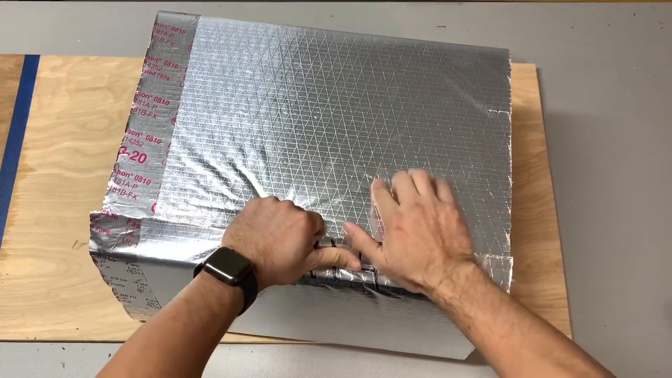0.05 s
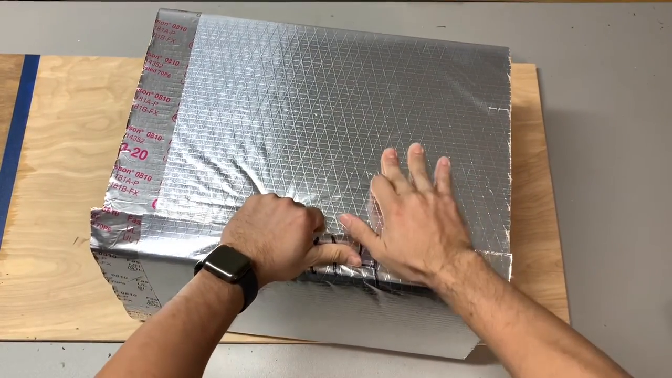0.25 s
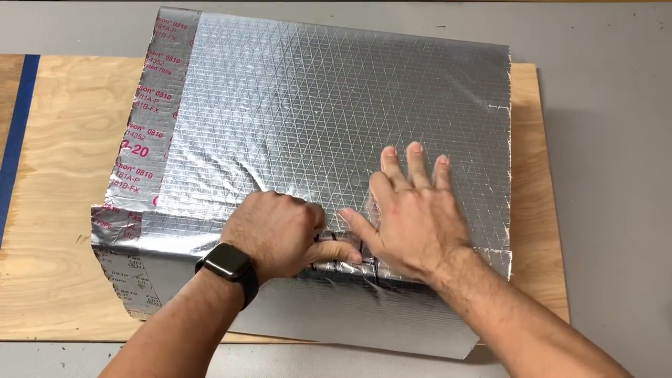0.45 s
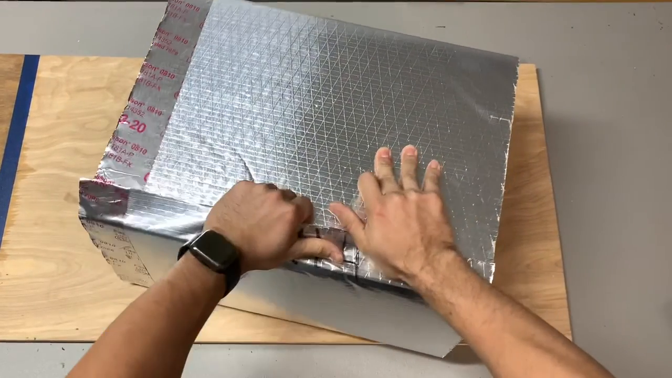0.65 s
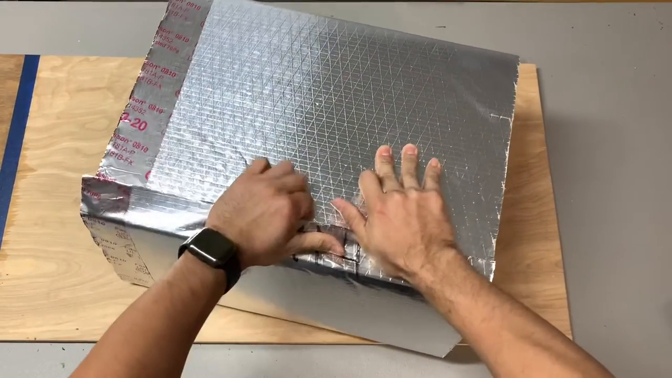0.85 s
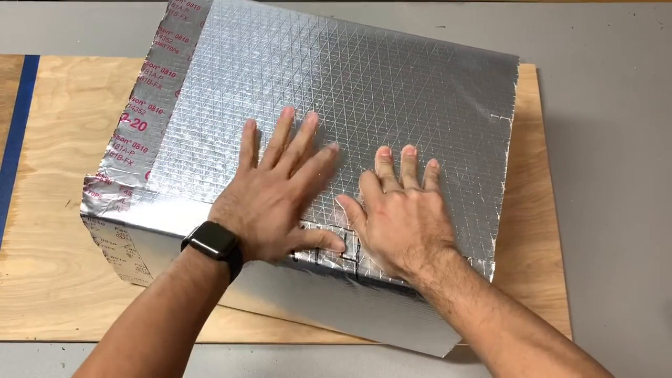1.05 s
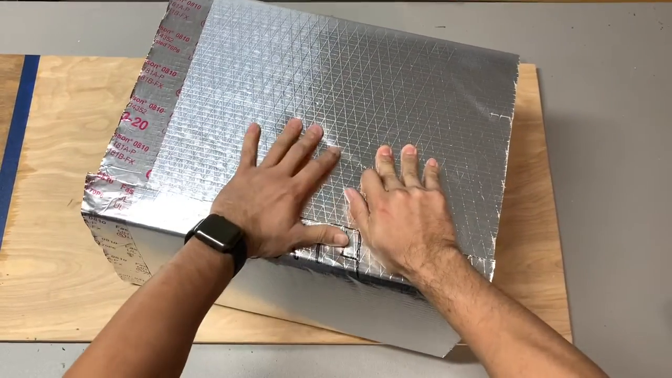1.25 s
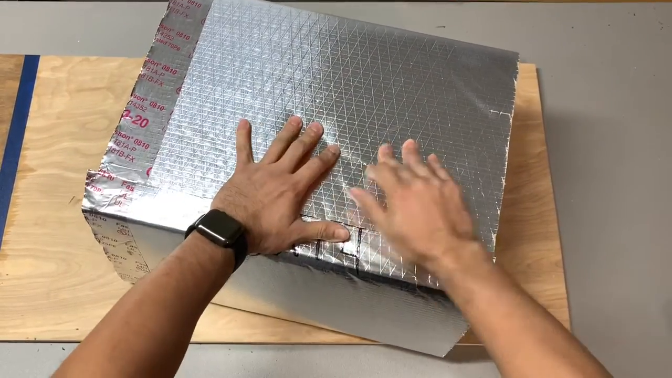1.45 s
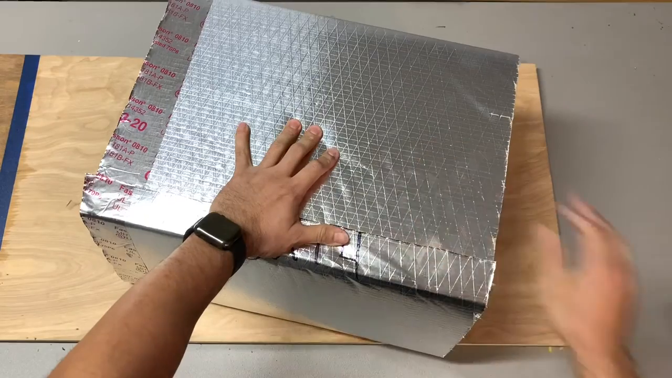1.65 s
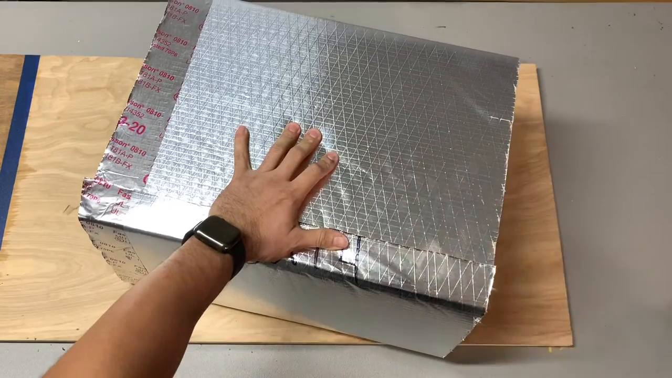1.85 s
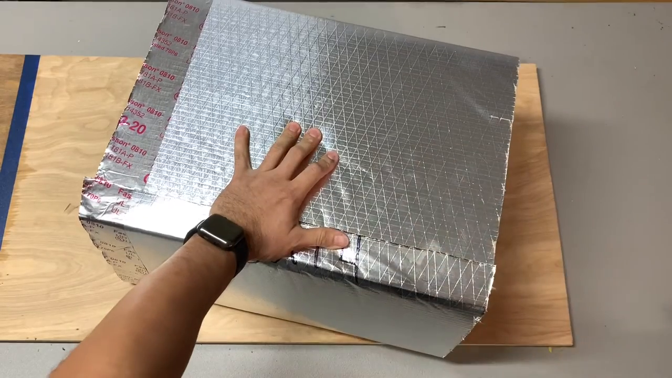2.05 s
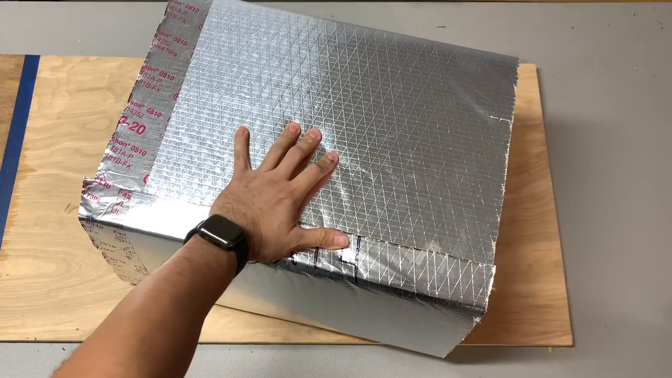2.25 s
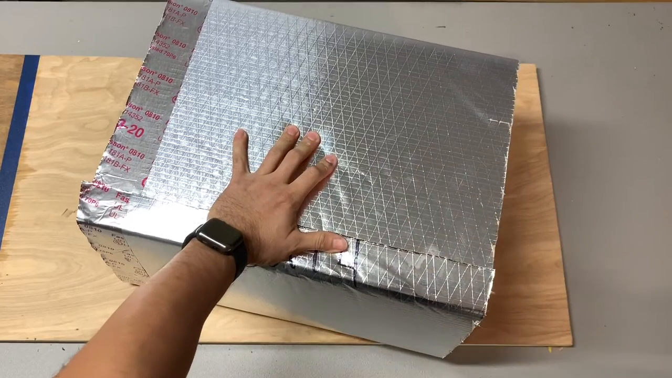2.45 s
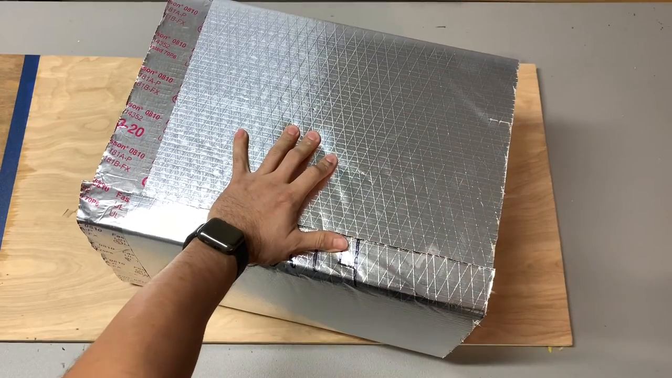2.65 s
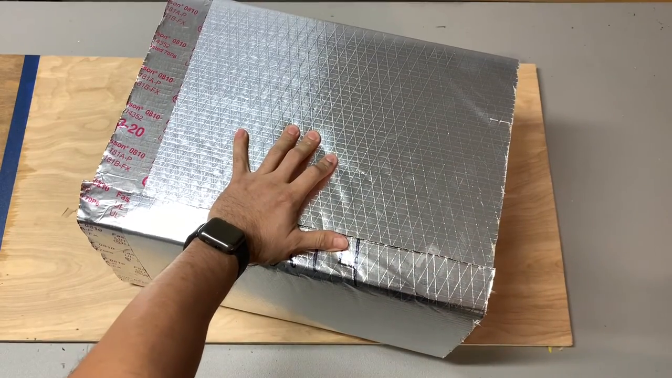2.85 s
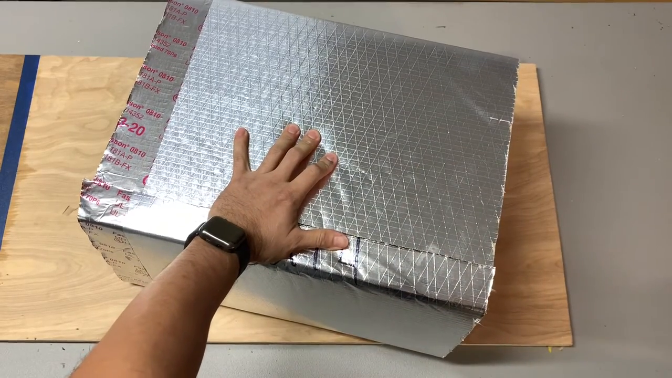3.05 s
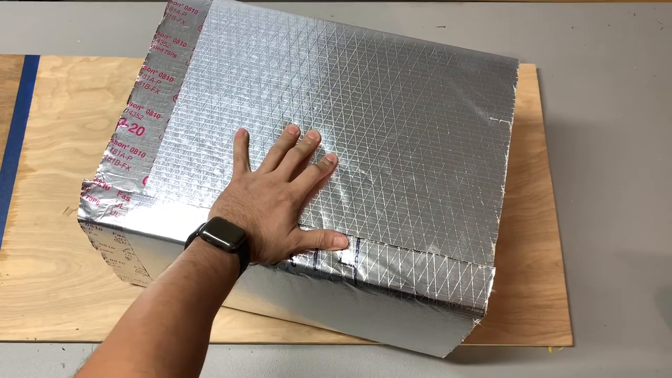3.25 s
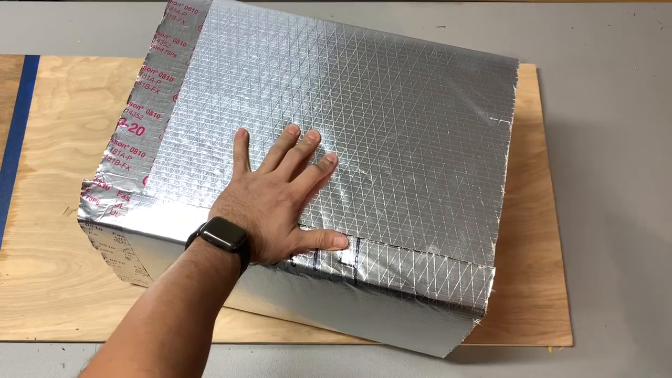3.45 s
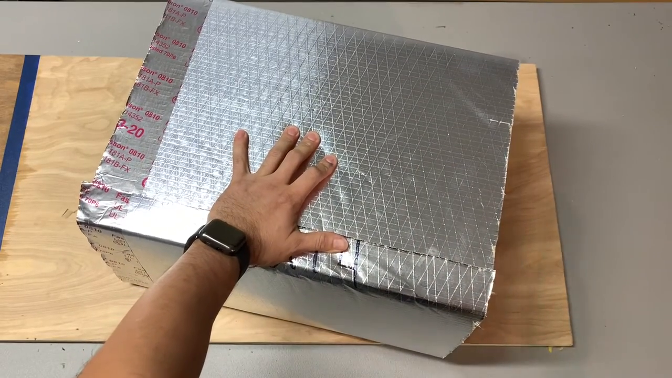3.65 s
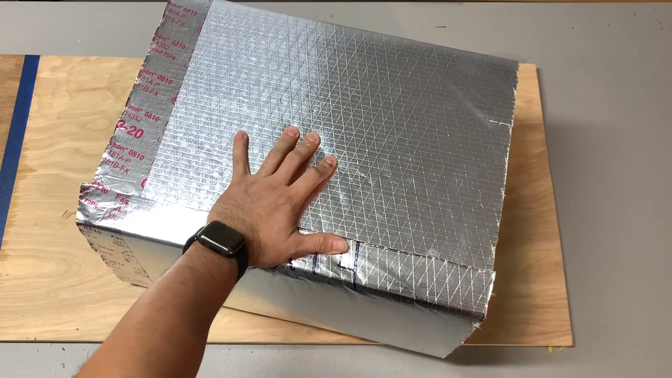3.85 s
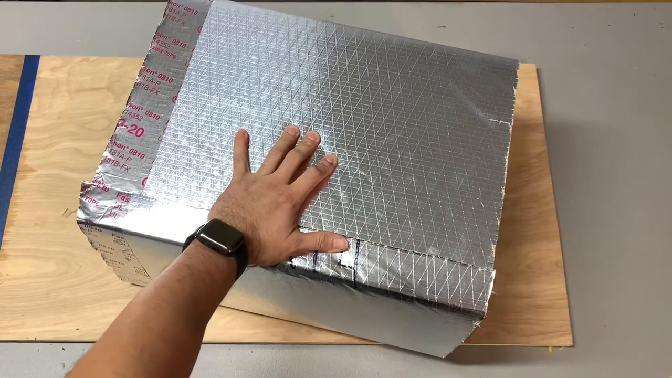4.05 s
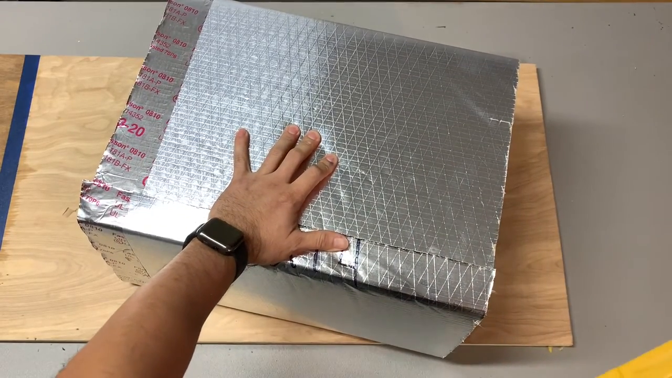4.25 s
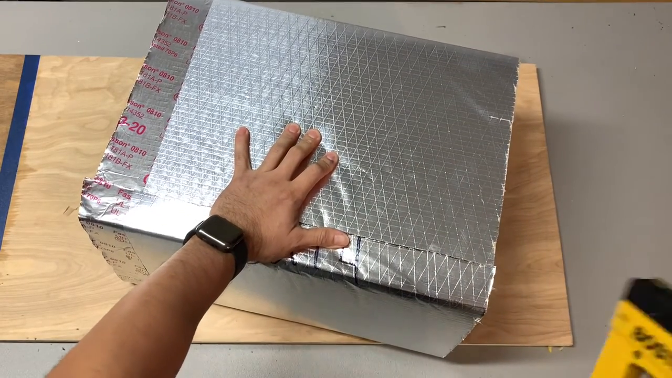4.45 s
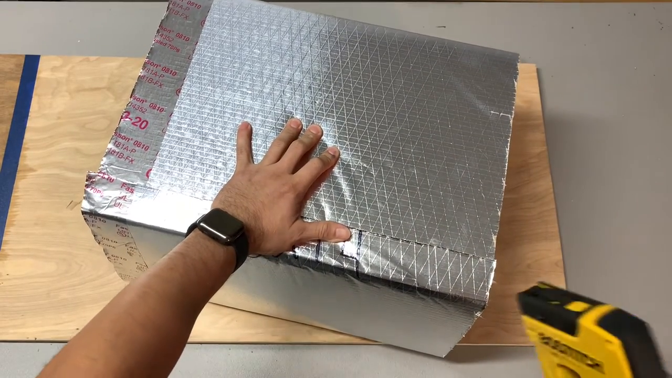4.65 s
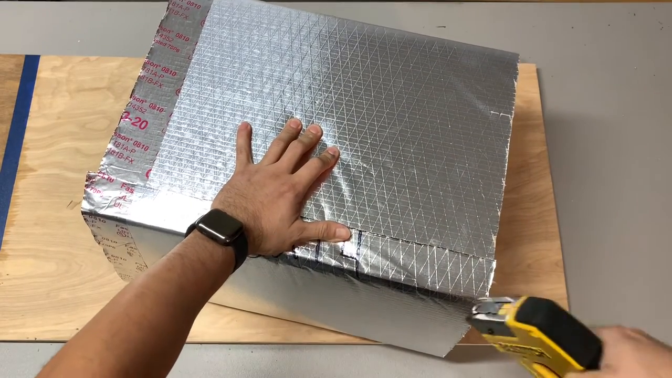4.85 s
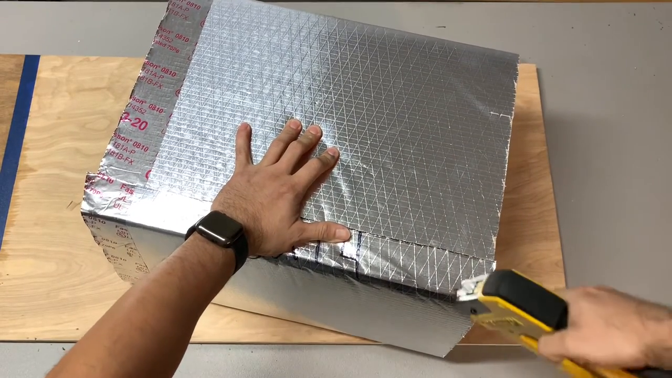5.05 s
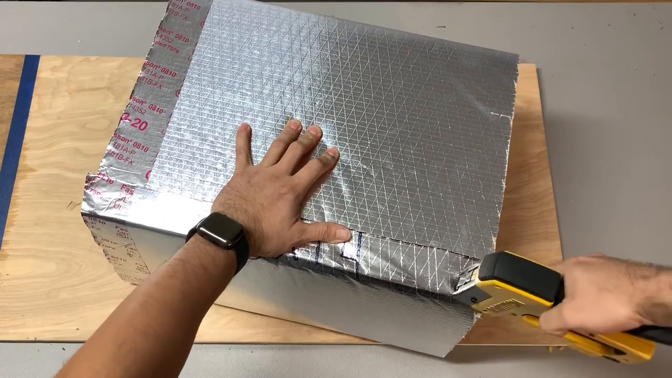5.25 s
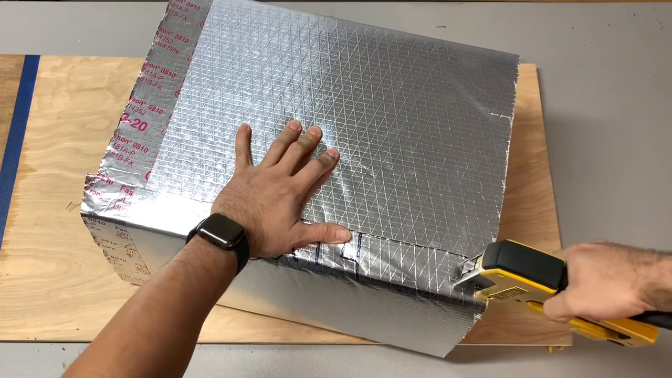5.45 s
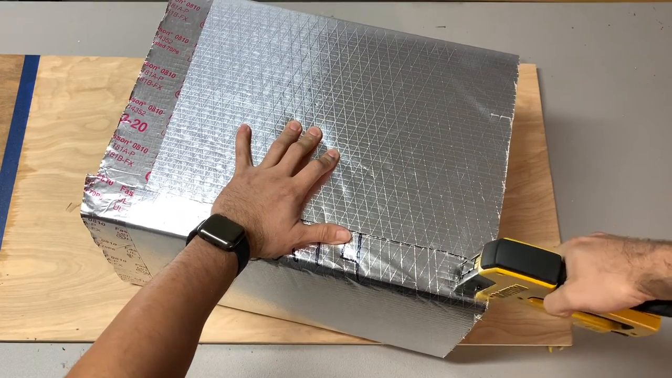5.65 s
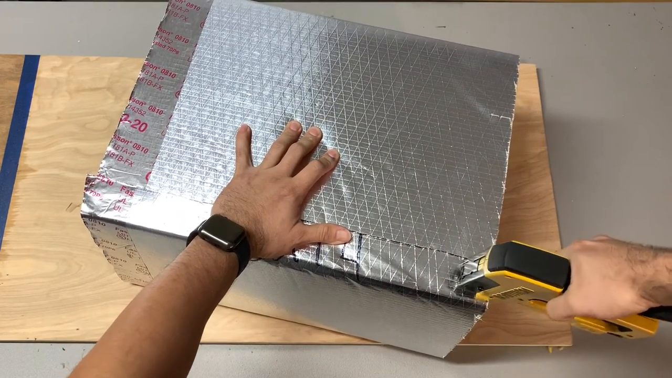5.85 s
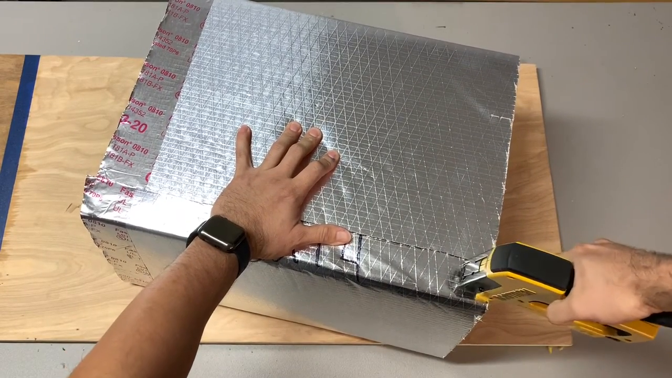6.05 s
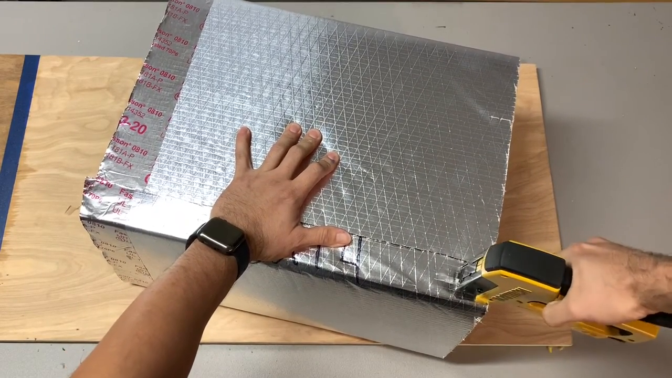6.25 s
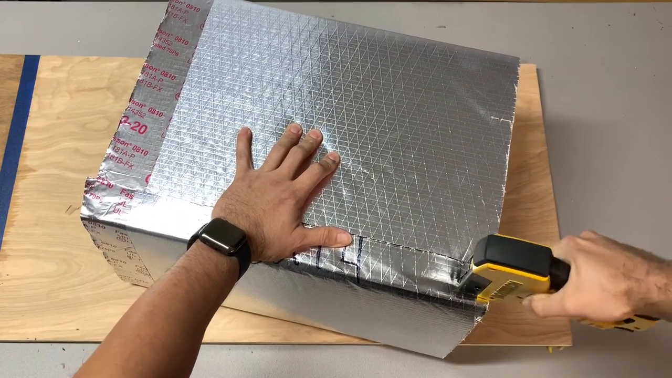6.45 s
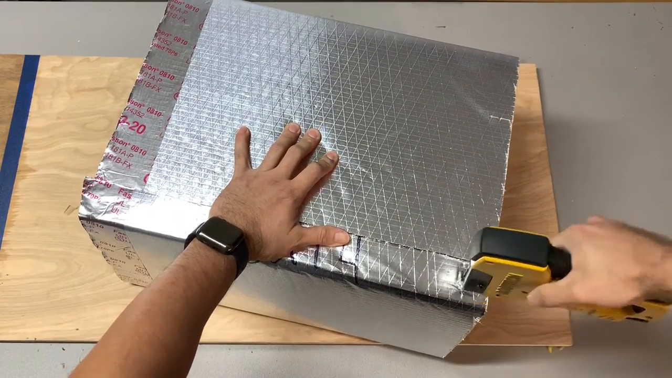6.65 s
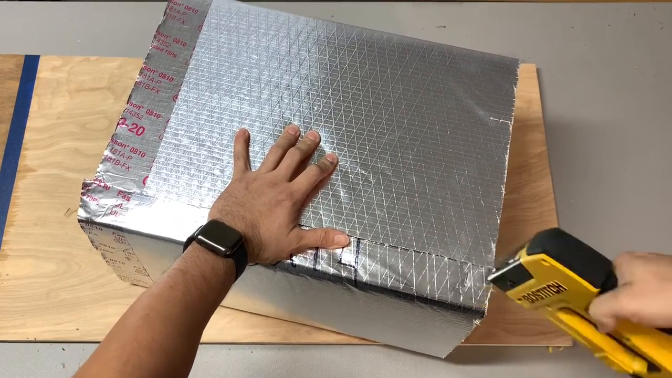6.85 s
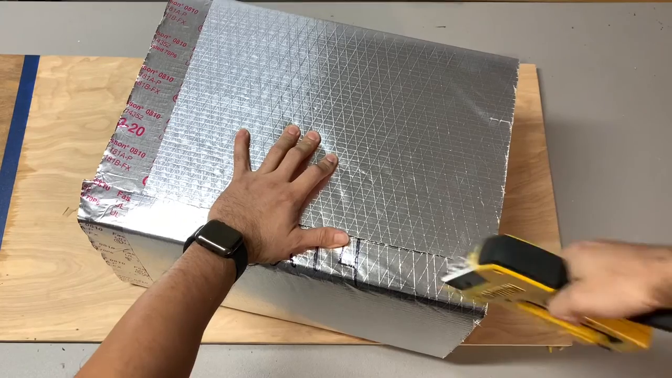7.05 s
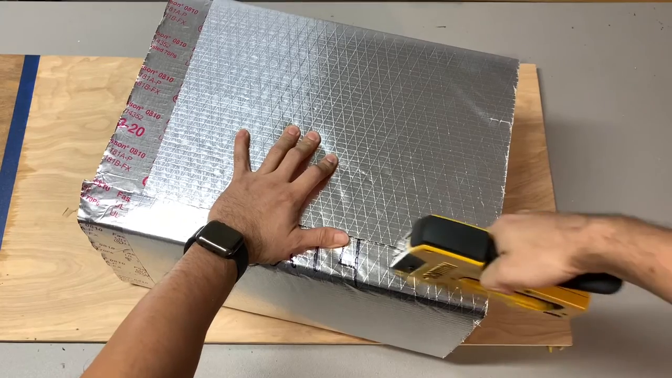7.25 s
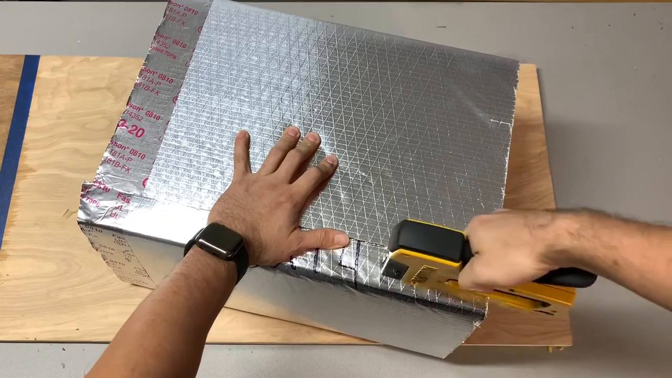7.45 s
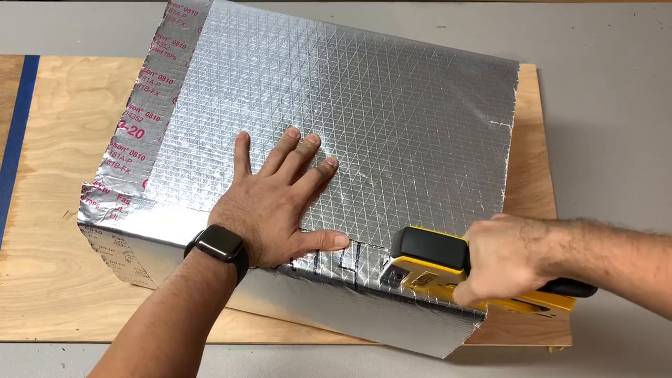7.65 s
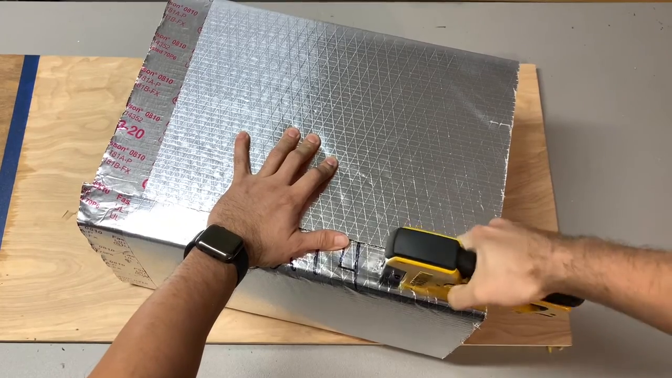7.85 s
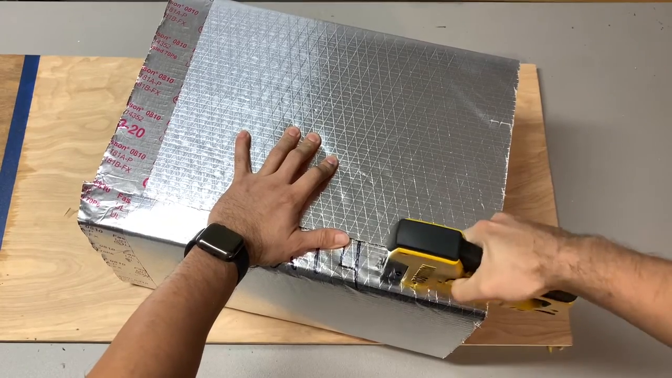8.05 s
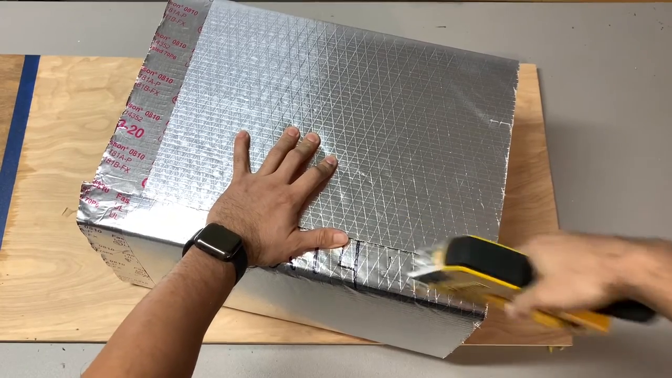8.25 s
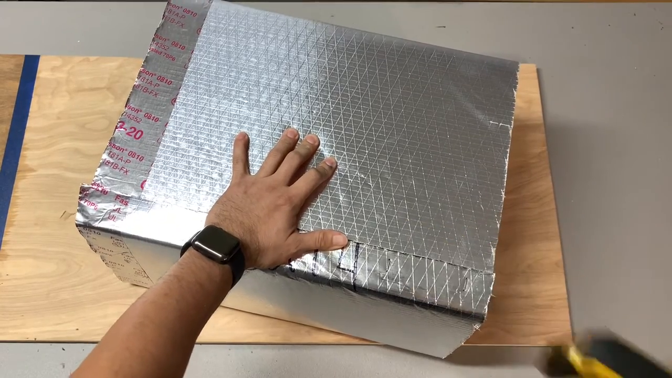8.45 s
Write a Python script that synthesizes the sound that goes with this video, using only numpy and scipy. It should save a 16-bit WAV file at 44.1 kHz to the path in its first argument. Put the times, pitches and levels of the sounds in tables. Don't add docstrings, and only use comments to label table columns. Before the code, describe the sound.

Hands thump and rub a hollow foil-covered foam box, foil crinkling, then a stapler clicks and fires two sharp, loud snaps in a workshop.

```python
import sys
import numpy as np
from scipy import signal
from scipy.fft import rfft, irfft, next_fast_len
from scipy.io import wavfile
from scipy.ndimage import uniform_filter1d, map_coordinates

SR = 44100
rng = np.random.default_rng(int(sys.argv[2]) if len(sys.argv) > 2 else 0)


def to_linear_factor(level_db):
    exponent = np.asarray(level_db, float) / 20
    return 10 ** exponent


def master(y):
    cut = np.clip(np.atleast_2d(y).T, -1, 1)
    pcm = np.round(cut * 32767)
    wavfile.write(sys.argv[1], SR, pcm.astype(np.int16))


N = 375291

# [t/s of peak, boom level/dB, rise/s, fall/s, rumble over boom/dB]
LEANS = [(0, -55, .1, 0.2, 8), (.09, -45.5, 0.18, 0.22, -4.5), (.2, -41, 0.14, 0.099, -13),
         (.38, -40, 0.066, 0.2, -16.5), (.52, -44, 0.4, 0.22, -23), (.81, -47, 0.096, 0.13, -5),
         (1.08, -48.5, 0.13, 0.49, -1.5), (1.37, -54, 0.086, 0.087, 1), (1.68, -63, 0.63, 0.29, -7),
         (2.03, -43.5, 0.064, 0.32, 0.5), (2.12, -48, 0.05, 0.26, 0), (2.29, -51, 0.14, 0.1, 4),
         (2.7, -40, 0.013, 0.14, -16), (2.95, -40.5, 0.16, 0.2, -1.5), (3.6, -62.5, 0.41, 0.42, -7),
         (4.25, -64, 0.22, 0.27, -11), (4.49, -55, 0.3, 0.19, -0.5), (4.65, -64, 0.4, 1, 2),
         (5.01, -56.5, 0.24, 0.38, -1), (5.32, -50.5, 0.031, 0.17, -3), (5.98, -63, 0.046, 0.19, 7.5),
         (6.2, -63, 0.06, 0.37, 3), (7.26, -68.5, 0.0063, 0.068, 3), (7.7, -61.5, 0.23, 0.28, -6)]
# [t/s of peak, level/dB, rise/s, fall/s]
ROCKING = [
    (6.56, -45, 0.32, 0.217),
    (7.2, -68, 0.54, 0.11),
]
# [f/Hz, width/Hz, level/dB]
BOX_MODES = [(173, 130, 7), (380, 160, 0.5)]
# [f/Hz, level/dB]
RUMBLE_BAND = [(20, -71.5), (35, -6), (75, 7), (120, -9.5), (200, -42)]
# [t/s of peak, level/dB, rise/s, fall/s]
SLEEVE_SWISHES = [
    (4.42, -72, .15, .3),
    (4.92, -57, 1.5, 0.41),
    (5.75, -68.5, 1.6, .2),
]
# [t/s of peak, board level/dB, rise/s, fall/s, squeal over board/dB]
DRAGS = [
    (1.96, -71, 0.0024, 0.13, 17),
    (2.1, -60, 0.08, 0.43, -1),
    (2.3, -52, 0.22, 0.14, -5),
    (2.685, -37, 0.0081, 0.21, -8),
    (2.87, -54.5, 0.081, 0.32, 1),
    (2.97, -64, 0.13, 0.055, -22),
]

# [t/s of peak, rub level/dB, rise/s, fall/s, hiss over rub/dB]
SLIDES = [(0, -51.5, .1, 1, -2.5), (.074, -41.5, 0.028, 0.014, -14), (.19, -43.5, 0.2, 0.15, -11),
          (.45, -39, 0.12, 0.26, -5.5), (.81, -50.5, 0.17, 0.17, -2), (1.06, -63.5, 0.25, 0.068, 1),
          (1.255, -50.5, 0.027, 0.033, -13), (1.38, -57, 0.6, 0.063, -8), (1.6, -57, 0.18, 0.24, -10),
          (1.71, -62.5, 0.081, 0.036, -9), (2.0, -54, 0.059, 0.17, -2), (2.3, -53, 0.25, 0.18, -8.5),
          (2.87, -51.5, 0.078, 0.24, -8), (3.5, -65, 1, 1, -2), (4.5, -60.5, 0.52, 1, -8),
          (4.7, -78, 0.52, 1, 20), (4.985, -47, 0.017, 0.078, -5.5), (5.31, -58.5, 0.26, 0.27, -16),
          (5.6, -62, 0.019, 0.35, -0.5), (5.92, -62, 0.014, 0.46, -9), (6.18, -58, 0.082, 0.095, 0.5),
          (7.026, -65.5, 0.039, 0.029, -5), (7.45, -65.5, 0.41, 1, -4.5), (7.68, -60.5, 0.17, 0.11, 0.5),
          (8.48, -74, 0.17, 0.13, 1)]
# [t/s of peak, sizzle level/dB, rise/s, fall/s]
CRINKLES = [(0, -45.5, .1, 0.51), (.19, -49.5, .2, 0.54), (.46, -41, 0.17, 0.31), (.729, -38, .004, 0.015),
            (.738, -37, 0.005, 0.026), (.797, -33.5, 0.017, 0.036), (1.0, -50, 0.94, 1),
            (1.25, -54.5, 0.5, 0.17), (1.74, -62.5, 0.21, 0.17), (2.5, -61, 0.12, 0.049),
            (2.9, -49.5, 0.017, 0.016), (3.18, -69, 0.22, 0.2), (3.47, -59.5, 0.34, 0.26),
            (4.3, -74, 0.15, 0.97), (4.53, -60, 0.57, 1), (4.985, -49.5, 0.026, 0.36),
            (5.33, -56, 0.12, 0.078), (5.5, -52, 0.045, 0.092), (5.72, -51.5, 0.45, 0.61),
            (6.0, -70, 0.19, 0.11), (6.2, -55, 0.3, 1), (7.4, -64.5, 0.087, 0.6), (7.64, -57.5, 0.18, 1)]
# [f/Hz, level/dB]
RUB_BAND = [(300, -22), (600, -2.5), (950, -3.5), (1350, -4), (2300, -5), (3500, -20.5)]
# [f/Hz, level/dB]
HISS_BAND = [(1800, -26), (2700, -1), (4500, 2), (7200, -9.5), (9000, -36.5)]
# [f/Hz, level/dB]
SIZZLE_BAND = [(6500, -17), (7600, -11), (8800, -2.5), (11000, -11), (15500, -8.5), (16300, -21),
               (17000, -54.5)]
# [t/s of peak, level/dB, rise/s, fall/s]
SHUDDERS = [
    (.075, -61, .03, .05),
    (.19, -42.5, 0.057, 0.039),
    (.38, -41.5, 0.084, .15),
    (.44, -40, 0.091, 0.17),
    (.51, -44.5, 0.098, 0.066),
    (.8, -57, 0.029, .05),
    (1.62, -64, 0.17, 0.043),
    (2.87, -65, 0.038, 0.38),
]
# [f/Hz, width/Hz, level/dB]
PANEL_MODES = [(510, 190, -10.5), (960, 320, -8), (1750, 180, -11.5)]
# [t/s of peak, level/dB, rise/s, fall/s]
SCUFFS = [
    (1.955, -53, .006, 0.1),
    (4.99, -55.5, 0.062, .05),
    (5.305, -50, 0.02, 0.036),
    (5.6, -72, 0.018, .2),
    (5.915, -62, 0.0046, .15),
    (5.955, -58, 0.03, .06),
    (7.61, -57, 0.011, 0.027),
]
# [f/Hz, width/Hz, level/dB]
NOSE_MODES = [(1740, 470, 4.5), (2430, 640, 0)]

# [t/s, level/dB, f/Hz, t60/s]
BOUNCES = [(.162, -36, 230, .06), (.24, -39, 253, .07), (.336, -33, 380, 0.061), (.813, -30.5, 238, 0.071),
           (1.021, -29.5, 442, 0.13), (1.067, -37.5, 427, 0.11), (1.345, -38, 600, 0.023),
           (2.018, -38.5, 212, 0.13), (2.033, -38, 222, 0.17), (2.105, -36, 169, 0.062),
           (2.681, -12, 381, 0.024), (2.692, -25.5, 337, 0.11), (2.716, -28.5, 397, 0.052),
           (2.724, -28, 425, .06), (2.74, -29, 437, 0.064), (2.756, -32, 393, 0.057),
           (2.682, -41, 950, 0.15), (2.735, -41, 722, 0.13), (2.86, -43, 1096, .08), (2.938, -34, 170, .06),
           (2.964, -31, 150, .06), (7.258, -66, 560, 0.075)]
# [t/s, peak level/dB, f/Hz, t60/s, slap level/dB]
KNOCKS = [(0.077, -28.5, 187, 0.047, -13), (0.192, -36, 215, 0.086, -17), (0.293, -41.5, 230, 0.022, -1.5),
          (0.354, -33, 416, 0.051, -7), (0.797, -36, 373, 0.061, -27), (1.0198, -20.5, 176.8, 0.12, -21),
          (1.016, -28.5, 365, 0.12, -1), (1.375, -58.5, 197, 0.08, 4), (1.961, -44, 223, 0.15, -12),
          (2.679, -46, 330, 0.14, -4), (2.975, -45, 216.7, 0.53, -17), (5.001, -47, 294, 0.14, -20),
          (5.313, -41, 298, 0.06, -0.5), (5.979, -54.5, 165, 0.14, -16), (7.251, -55, 118.8, 0.092, -3.5),
          (7.657, -55.5, 226, 0.078, 10.5)]
# [f/Hz, level/dB]
SLAP_BAND = [(200, -11), (450, 5.5), (1500, -2), (2200, -12), (5000, -15), (9000, -18)]

# [t/s, level/dB, f/Hz, t60/s]
PINGS = [(1.6, -65, 860, 0.2), (1.951, -50, 1516, 0.16), (4.32, -48, 1500, 0.074),
         (5.308, -44, 2320, 0.034), (5.965, -46, 1524, .06), (7.128, -70, 1360, 0.35),
         (7.128, -48.5, 1416, 0.034), (7.129, -58.5, 4600, .02), (7.609, -45.5, 1627, 0.05),
         (.07, -26, 1160, .012), (.126, -35, 870, .025), (.146, -30, 920, 0.02), (.179, -38, 930, .03),
         (.291, -32, 830, .03), (.866, -36.5, 624, 0.026), (1.012, -61, 1100, 0.1),
         (1.012, -38.5, 1540, .08), (1.014, -40, 1720, .1), (1.011, -37, 894, .06), (1.95, -47, 1257, 0.09),
         (5.91, -51, 1900, 0.033), (5.931, -47, 1480, .04), (5.931, -60, 1900, .02),
         (5.966, -43, 4400, 0.023), (5.966, -53, 2700, 0.028), (6.2957, -8, 1440, 0.027),
         (6.3045, -14.5, 1500, 0.013), (6.296, -18, 4410, .025), (6.3029, -19.5, 9850, 0.041),
         (7.7875, -19.5, 11350, 0.019), (7.784, -14.5, 3690, 0.038), (7.784, -20, 1500, 0.028),
         (4.018, -40, 3000, .03), (4.057, -36, 1413, 0.027), (5.308, -48, 4500, .03),
         (3.9622, -28.5, 4880, 0.1), (3.964, -34, 7350, .08), (8.058, -42.5, 3640, .03),
         (8.066, -45.5, 2310, 0.031)]
# [t/s, peak level/dB, ring f/Hz]
SNAPS = [(1.254, -46, 3550), (3.6292, -52.5, 4240), (3.7152, -31, 7350), (4.538, -50, 6500),
         (5.0776, -45, 5100), (5.13, -46.5, 6800), (5.2145, -46.5, 7170), (5.6964, -54, 4820),
         (7.354, -64.5, 6000), (7.38, -66, 6500), (7.41, -74, 6500), (7.6574, -35.5, 7100)]
# [t/s, peak level/dB, ring f/Hz]
TAPS = [(0.069, -37, 1200), (0.2915, -79, 780), (1.948, -40, 4140), (2.6793, -35, 2730), (4.018, -44, 3030),
        (4.057, -45, 1480), (5.308, -50, 2460), (6.6102, -26.5, 1650), (7.6064, -53.5, 1650)]
# [t/s, peak level/dB, ring f/Hz, body level/dB, t60/s]
CLICKS = [(1.0124, -48.5, 4500, -17, 0.081), (2.574, -73, 3260, 7, 0.019),
          (3.329, -35.5, 4230, -43, 0.0091), (3.926, -42, 4200, -23, 0.027),
          (3.9619, -21.5, 4840, -24, 0.02), (3.967, -24.5, 3600, -28, 0.04), (3.982, -23, 4560, -23, 0.014),
          (4.3178, -34.5, 5600, -12.5, 0.015), (4.7, -58, 4500, -25, 0.015), (5.299, -60, 2420, 0, 0.029),
          (5.966, -40, 4300, -5.5, 0.017), (6.2333, -50, 5100, -6, 0.1), (7.0258, -57, 2495, -10, 0.017),
          (7.128, -44, 4640, -9.5, 0.015), (8.485, -59, 5090, -1.5, 0.018)]
# [t/s, peak level/dB, ring
# f/Hz, edge level/dB, t60/s]
LATCHES = [(3.056, -44.5, 4730, -2, 0.014), (.754, -51, 9000, 12, .004), (.8495, -40, 7000, 12.5, 0.0054),
           (.867, -38, 4530, 10, 0.0053), (7.645, -53.5, 7200, 4.5, 0.013), (3.714, -44, 5100, -10, 0.023),
           (3.9539, -34.5, 5100, -18, 0.017), (3.964, -36, 7070, -6.5, 0.1), (3.997, -38, 5130, 5, 0.047),
           (4.0578, -33, 2900, -3, 0.016), (4.985, -55, 4170, -8, 0.0067),
           (6.2719, -22.5, 4440, 8.5, 0.015), (6.281, -32.5, 4300, 5, 0.018),
           (6.5889, -23, 3750, -0.5, 0.038), (6.598, -31.5, 2600, 1.5, .025), (6.623, -29, 2450, -8, 0.03),
           (7.12, -69.5, 6900, 12, 0.0071), (7.763, -28, 2080, 5.5, 0.014), (8.058, -36, 3744, 0, 0.03)]
# [f/Hz, width/Hz, level/dB]
CASE_MODES = [(800, 710, -8), (1460, 30, 9.5), (2210, 290, -2)]

# [t/s of the stop, drive level/dB, crack level/dB, crack lead/s, thud lag/s]
SHOTS = [
    (6.302, -15, -9, 0.00038, .0015),
    (7.79, -16, -14.5, 0.0038, -.0002),
]
# [thud level/dB, pitch fall f/Hz (starts near 75 + 1.8 f), t60/s, jump level/dB, skin
# level/dB]
THUDS = [
    (-6, 300, 0.099, -15.5, -29),
    (-10, 400, 0.068, -28.5, -16),
]
# [f/Hz, level/dB]
DRIVE_BAND = [(240, -53), (500, -15.5), (865, -9), (1530, 0), (2970, -11.5), (4510, -2.5), (5030, -9.5),
              (7280, -13.5), (9040, -28.5), (10500, -32.5), (16000, -44.5)]
# [f/Hz, level/dB]
CRACK_BAND = [(240, -28), (500, -18.5), (1750, -1), (2840, -24.5), (4680, -9), (6000, -24.5), (8500, 2.5),
              (10000, -3), (13500, -11.5), (15500, -8), (16500, -31)]
# [f/Hz, level/dB]
THROWN_BANDS = [
    [(350, -13), (900, -3), (1500, 0), (2400, -1), (3200, -0.5), (4500, -1.5), (6500, 0.5), (10000, 0)],
    [(350, 1), (640, -5.5), (1100, 2), (1500, -5), (2400, 2.5), (3200, 0.5), (4500, -0.5), (10000, -2)],
]

# [f/Hz, t60/s, level/dB]
ROOM_DECAY = [(101, 0.11, -27.5), (393, 0.49, -20), (804, 0.59, -8), (1540, 0.64, -10.5),
              (2600, 0.64, -5.5), (4340, 0.64, -8.5), (6500, 0.65, -6.5), (10370, 0.54, -8.5),
              (13000, 0.24, -3.5), (16000, 0.3, -10)]
# [f/Hz, width/Hz, level/dB]
LINGER_MODES = [(647, 53, 5.5), (1140, 90, 2), (1290, 48, 0.5), (1510, 100, 3.5), (1905, 50, 3),
                (2540, 120, 6), (3230, 72, 0.5), (4300, 79, 2.5), (4770, 180, 1), (6570, 200, 4)]
# [f/Hz, likeness/1]
LIKENESS = [(40, 0.56), (100, 1), (200, 0.94), (500, 0.19), (1200, 0.043), (5500, 0.013), (7000, 0.7)]
# [f/Hz, right over left/dB]
RIGHT_LEAN = [(500, 2), (1000, 0), (2500, 1), (5500, 8)]
# [t/s after the stop, level/dB]
GAIN_DUCK = [(0, 0.5), (.012, -11.5), (.03, -13), (.12, -10.5), (.2, -2.5), (.28, 0.5), (.36, 0.5)]

STILL_DB = dict(rumble=-64, boom=-73, rub=-76, hiss=-73, sizzle=-72.5)
SHY_DB = -10.5
LOW_TAIL_DELAY_S = .3
LOW_TAIL = (-64.5, 1.3, .5, -7)  # boom/dB, rise/s, fall/s, rumble over boom/dB
CREASES_PER_S, CREASE_DB = 530, -9
SNAP, TAP = (-18, 7.9, 0.013), (-21, -14, 0.026)  # body/dB, edge/dB, t60/s
CLICK_EDGE_DB, LATCH_BODY_DB = -4.5, -10
TOUCH_DB, TOUCH_T60_S = 3, 0.0026
CONTACT_RING_RATIO, LATCH_RING_RATIO = 2.7, 2
UPPER_DB = -13.5
SEND = dict(ticks=0.33, box=0.28)
FLUTTER_DB = 1


def unit(x):
    return x / np.sqrt(np.mean(x ** 2) + 1e-20)


def along(points, hz):
    f, v = np.transpose(points)
    return np.interp(np.log(hz + 1), np.log(f + 1), v)


def wobble(rate_hz):
    knots = rng.standard_normal(int(N * rate_hz / SR) + 4)
    return map_coordinates(knots, [np.arange(N) * rate_hz / SR])


def filtered(x, response):
    m = next_fast_len(x.shape[-1] + 4096)
    return irfft(rfft(x, m) * response(np.fft.rfftfreq(m, 1 / SR)), m)[..., :x.shape[-1]]


def modes(peaks, order=1):
    def response(f):
        total = 0
        for k, (c, w, db) in enumerate(peaks):
            total = total + (-1) ** k * to_linear_factor(db) * 1j * f * w / (c * c - f * f + 1j * f * w)
        return total ** order
    return response


def shape(spectrum):
    return lambda hz: to_linear_factor(along(spectrum, hz))


def high_pass(corner_hz, order=2):
    return lambda hz: hz ** order / (hz ** order + corner_hz ** order)


def noise(response, size=N):
    return unit(filtered(rng.standard_normal((2, size)), response))


def add(track, s, sound):
    start = round(s * SR)
    track[:, start:start + sound.shape[-1]] += sound[..., :N - start]


def swells(rows, floor_db, over=False):
    t_s = np.arange(0, N / SR, .002)
    rows = np.array(rows)
    late_s = t_s - rows[:, :1]
    drop = np.where(late_s < 0, -late_s / abs(rows[:, 2:3]), late_s / abs(rows[:, 3:4]))
    db = rows[:, 1:2] - 20 * drop + (rows[:, 4:] if over else 0)
    floor_db = floor_db + sum(SHY_DB * (t_s > shot[0]) for shot in SHOTS)
    gain = np.sqrt(np.sum(to_linear_factor(2 * db), axis=0) + to_linear_factor(2 * floor_db))
    return np.interp(np.arange(N) / SR, t_s, gain)


def struck(rows, length_s, rise_s, weights):
    out, t_s = np.zeros((2, N)), np.arange(int(SR * length_s)) / SR
    for s, db, hz, t60_s in rows:
        envelope = to_linear_factor(db - 60 * t_s / t60_s) * (1 - np.exp(-t_s / rise_s))
        add(out, s, envelope * np.sin(2 * np.pi * hz * t_s) * weights)
    return out


def room(x):
    hz, t_s, z = signal.stft(x[0], SR, nperseg=256)
    t60_s = along(np.array(ROOM_DECAY)[:, :2], hz)
    wet_db = along(np.array(ROOM_DECAY)[:, ::2], hz)
    keep = to_linear_factor(-120 * t_s[1] / t60_s)
    fed = abs(uniform_filter1d(abs(z) ** 2, size=5, axis=0))
    power = np.array([signal.lfilter([0, 0, 1 - k], [1, -k], p) for k, p in zip(keep, fed)])
    field = signal.stft(rng.standard_normal((2, N)), nperseg=256)[2]
    flutter = unit(uniform_filter1d(rng.standard_normal(z.shape), size=12, axis=0))
    field = field * to_linear_factor(FLUTTER_DB * flutter)
    field /= np.sqrt(np.mean(abs(field) ** 2))
    wet = field * np.sqrt(power) * to_linear_factor(wet_db + 13.0)[:, None]
    return signal.istft(wet, nperseg=256)[1][:, :N]


def standing_waves(x):
    knots = rng.standard_normal(SR // 120 + 2)

    def response(hz):
        ripple_db = 1.5 * map_coordinates(knots, [hz / 60])
        linger_db = sum(db / (1 + (2 * (hz - c) / w) ** 2) for c, w, db in LINGER_MODES)
        return to_linear_factor(ripple_db + linger_db)
    return filtered(x, response)


def bench():
    moves = LEANS + [(shot[0] + LOW_TAIL_DELAY_S, *LOW_TAIL) for shot in SHOTS]
    boom = swells(moves, STILL_DB["boom"])
    rumble = swells(moves, STILL_DB["rumble"], over=True)
    lumps = to_linear_factor(3.0 * wobble(90)) * rng.standard_normal((2, N))
    rock = swells(ROCKING, -np.inf) * np.sqrt(2) * np.sin(2 * np.pi * 44 * np.arange(N) / SR)
    return boom * unit(filtered(lumps, modes(BOX_MODES))) + rumble * noise(shape(RUMBLE_BAND)) + rock


def sleeve():
    cloth = [(1480, 250, -7), (2450, 300, -7), (3800, 600, -3), (4900, 1000, 0)]  # f/Hz, width/Hz, level/dB
    return swells(SLEEVE_SWISHES, -np.inf) * to_linear_factor(1.0 * wobble(40)) * noise(modes(cloth, order=2))


def drag():
    judder = to_linear_factor(1.1 * wobble(70))
    board = unit(judder * noise(modes([(410, 130, 0)], order=2)))
    squeal = unit(judder * noise(modes([(2800, 900, 0)], order=2)))
    return swells(DRAGS, -np.inf) * board + swells(DRAGS, -np.inf, over=True) * squeal


def foil():
    grain = 0.93 * wobble(60) + 1.0 * wobble(300)
    layers = [(swells(SLIDES, STILL_DB["rub"]), RUB_BAND),
              (swells(SLIDES, STILL_DB["hiss"], over=True), HISS_BAND),
              (swells(CRINKLES, STILL_DB["sizzle"]), SIZZLE_BAND)]
    out = np.zeros((2, N))
    for gain, band in layers:
        roughness = to_linear_factor(grain + 0.33 * wobble(110))
        out += gain * unit(roughness * noise(shape(band)))
    return out


def creases():
    pops = (rng.random((2, N)) < CREASES_PER_S / SR) * rng.standard_normal((2, N))
    pops = pops * to_linear_factor(2.8 * rng.standard_normal(N))
    colour = modes([(930, 410, 2.5), (2400, 1600, -15.0)])
    return swells(SLIDES, -np.inf) * to_linear_factor(CREASE_DB) * unit(filtered(pops, colour))


def lumpy_slips(peaks):
    return unit(to_linear_factor(2.4 * wobble(200)) * noise(modes(peaks, order=2)))


def shudder():
    palm = swells(SHUDDERS, -np.inf) * lumpy_slips(PANEL_MODES)
    return palm + swells(SCUFFS, -np.inf) * lumpy_slips(NOSE_MODES)


def bounces():
    return struck(BOUNCES, length_s=.2, rise_s=.0025, weights=[[1], [.1]])


def knocks():
    out, t_s = np.zeros((2, N)), np.arange(SR // 5) / SR
    for s, db, hz, t60_s, slap_db in KNOCKS:
        upper = to_linear_factor(UPPER_DB - 30 * t_s / t60_s) * np.sin(2 * np.pi * 2.5 * hz * t_s)
        ring = np.sin(2 * np.pi * hz * t_s) + upper
        slap = to_linear_factor(slap_db - 60 * t_s / 0.086) * (1 - np.exp(-t_s / 0.00044))
        slap = slap * noise(shape(SLAP_BAND), size=len(t_s))
        add(out, s - .004, to_linear_factor(db) * slap)
        envelope = to_linear_factor(db + 9.0 - 60 * t_s / max(t60_s, .02)) * (1 - np.exp(-t_s / 0.0052))
        add(out, s, envelope * ring * [[1], [.1]])
    return out


def pings():
    return struck(PINGS, length_s=.25, rise_s=.0007, weights=[[1], [-.2]])


def contacts():
    rows = [(s, db, hz, body_db, CLICK_EDGE_DB, t60_s, CONTACT_RING_RATIO)
            for s, db, hz, body_db, t60_s in CLICKS]
    rows += [(s, db, hz, LATCH_BODY_DB, edge_db, t60_s, LATCH_RING_RATIO)
             for s, db, hz, edge_db, t60_s in LATCHES]
    rows += [(*row, *SNAP, CONTACT_RING_RATIO) for row in SNAPS]
    return rows + [(*row, *TAP, CONTACT_RING_RATIO) for row in TAPS]


def ticks():
    out, t_s, rows = np.zeros((2, N)), np.arange(SR // 8) / SR, contacts()
    size = len(t_s)
    colours = (modes(CASE_MODES), shape(HISS_BAND), shape(SIZZLE_BAND))
    stock = zip(*[np.split(noise(c, size=size * len(rows)), len(rows), axis=1) for c in colours])
    for (s, db, hz, body_db, edge_db, t60_s, ring_ratio), (shell, hiss, edge) in zip(rows, stock):
        ring = 0.5 * noise(modes([(hz, 180, 0)]), size=size) + to_linear_factor(body_db + 6.5) * shell
        spike = hiss + to_linear_factor(edge_db) * edge
        chatter = np.repeat(rng.standard_normal(size // 32 + 1), 32)[:size]
        attack = 1 - np.exp(-t_s / (0.057 * t60_s))
        touch = to_linear_factor(TOUCH_DB - 60 * t_s / TOUCH_T60_S) * (edge_db == CLICK_EDGE_DB)
        bright = (to_linear_factor(-60 * t_s / t60_s) * attack * to_linear_factor(0.92 * chatter) + touch) * spike
        ringing = to_linear_factor(-60 * t_s / (ring_ratio * t60_s)) * attack * ring
        add(out, s, to_linear_factor(db - 1.0) * (bright + ringing) * [[1], [.6]])
    return out


def wall_thud(t_s, thud_db, hz, t60_s, jump_db, skin_db):
    def sine(f_hz):
        return np.sin(2 * np.pi * f_hz * t_s)
    turns = 75 * t_s + hz * 0.0047 * (1 - np.exp(-t_s / 0.0026))
    thud = to_linear_factor(thud_db - 60 * t_s / t60_s) * np.sin(2 * np.pi * turns) * (1 - np.exp(-t_s / 0.0016))
    jump = to_linear_factor(jump_db - 60 * t_s / 0.24) * sine(48)
    skin = to_linear_factor(skin_db - 60 * t_s / 0.055) * (sine(655) + 0.67 * sine(900))
    nose_plate = to_linear_factor(-26.5 - 60 * t_s / 0.023) * sine(1100)
    return thud + jump + skin + nose_plate


def shots():
    out, sent, lead_in_s = np.zeros((2, N)), np.zeros((2, N)), .02
    t_s = np.arange(SR // 4) / SR - lead_in_s
    after_s = np.clip(t_s, 0, None)
    for (s, drive_db, crack_db, lead_s, lag_s), box, thrown in zip(SHOTS, THUDS, THROWN_BANDS):
        swell = to_linear_factor(drive_db - 2800 * np.clip(-t_s - .005, 0, None) - 2200 * after_s)
        slam = to_linear_factor(crack_db - 45000 * np.clip(-t_s - lead_s, 0, None) - 3400 * after_s)
        thud = wall_thud(after_s, *box)
        scrape = swell * noise(shape(DRIVE_BAND), size=len(t_s))
        steel = scrape + slam * noise(shape(CRACK_BAND), size=len(t_s))
        start_s = s - lead_in_s
        add(out, start_s, steel * [[1], [.6]])
        add(out, start_s + lag_s, thud * [[1], [.1]])
        add(sent, start_s, filtered(steel + thud, shape(thrown)))
    return out, sent


def ports(pair):
    def mix(hz):
        turn = np.arccos(np.clip(along(LIKENESS, hz), -1, 1)) / 2
        return np.array([np.cos(turn), np.sin(turn)])
    mid, side = filtered(pair, mix)
    return np.array([mid + side, mid - side])


def scene():
    small = filtered(ticks() + pings(), high_pass(450))
    fired, sent = shots()
    box = knocks() + bounces()
    lean = lambda hz: to_linear_factor(np.outer([-.5, .5], along(RIGHT_LEAN, hz)))
    near = filtered(ports(small + fired + box), lean)
    to_room = sent + SEND["ticks"] * small + SEND["box"] * filtered(box, high_pass(700))
    tail = standing_waves(room(to_room))
    rubbing = bench() + drag() + foil() + creases() + sleeve() + shudder()
    return near + ports(tail + rubbing)


def widen(dry):
    def share(hz):
        return np.clip((hz - 6900) / 900, 0, 1)

    def spread(hz):
        lag_rad = 2 * np.pi * .0002 * np.clip(hz - 6030, 0, None)
        return np.exp(np.outer([-.5j, .5j], lag_rad))
    own = filtered(dry, lambda hz: spread(hz) * np.sqrt(1 - share(hz) ** 2))
    return own + filtered(dry[1], lambda hz: spread(hz) * share(hz))


def gain_control(x):
    t_s = np.arange(N) / SR
    after_s, duck_db = np.transpose(GAIN_DUCK)
    return x * to_linear_factor(sum(np.interp(t_s, after_s + shot[0], duck_db) for shot in SHOTS))


def top_cut(x):
    return signal.sosfilt(signal.butter(12, 16640, fs=SR, output="sos"), x)


def record(dry):
    ducked = gain_control(widen(dry))
    squeezed = ducked / (1 + abs(ducked / .9) ** 4) ** .25
    banded = filtered(squeezed, lambda hz: 1 / (1 + (hz / 15850) ** 80))
    banded = filtered(banded, high_pass(36, order=4))
    return top_cut(banded)


dry = scene()
out = record(dry)
master(out)
```